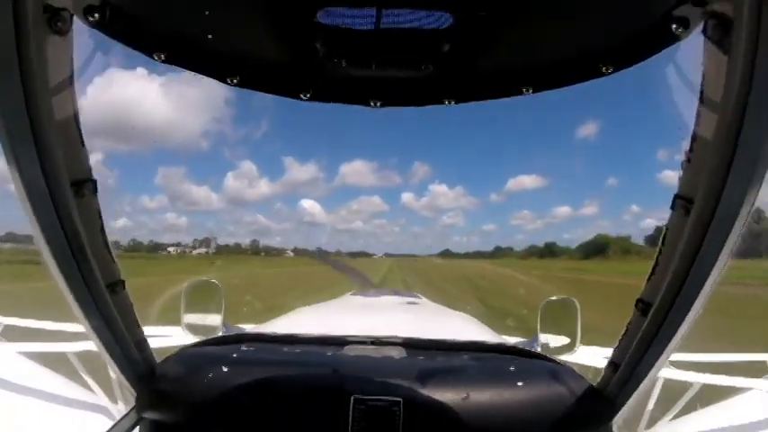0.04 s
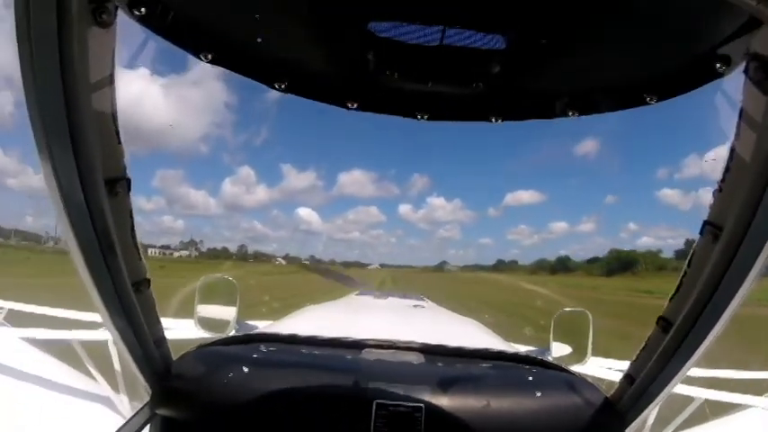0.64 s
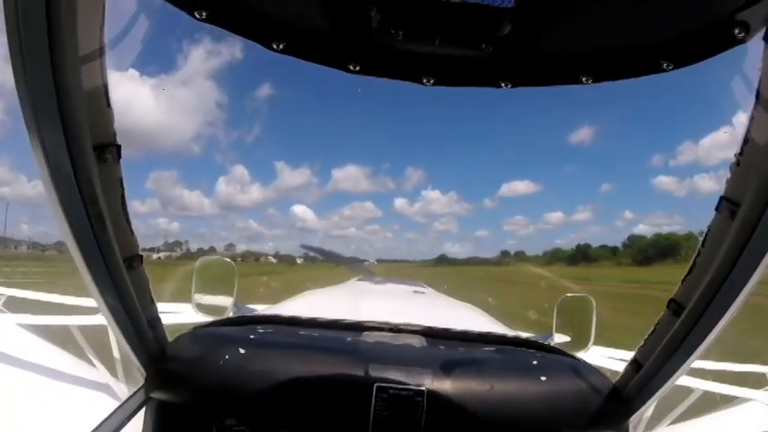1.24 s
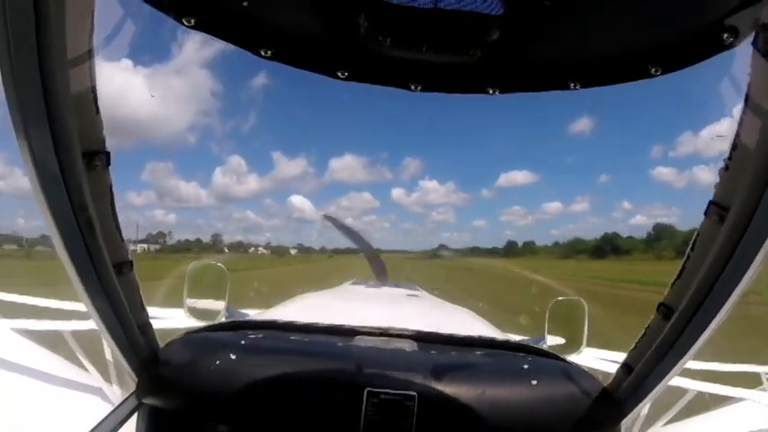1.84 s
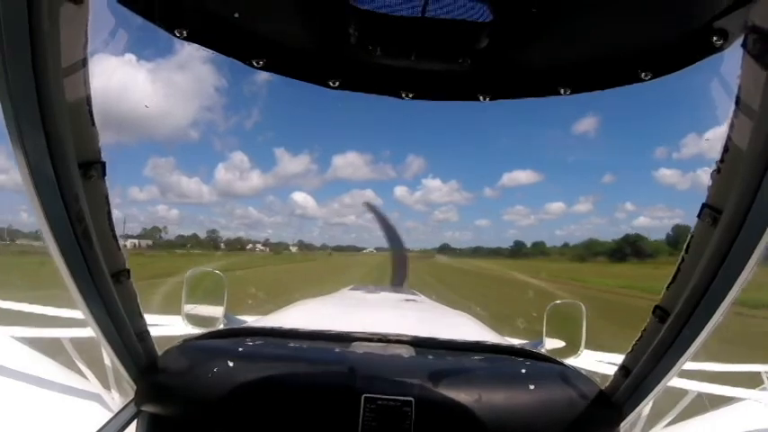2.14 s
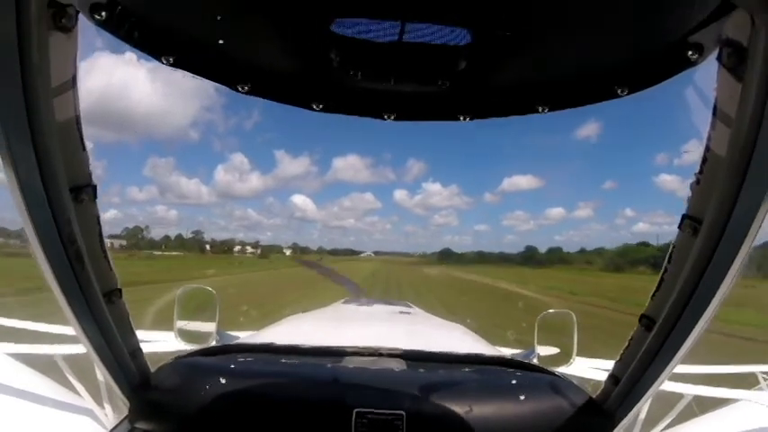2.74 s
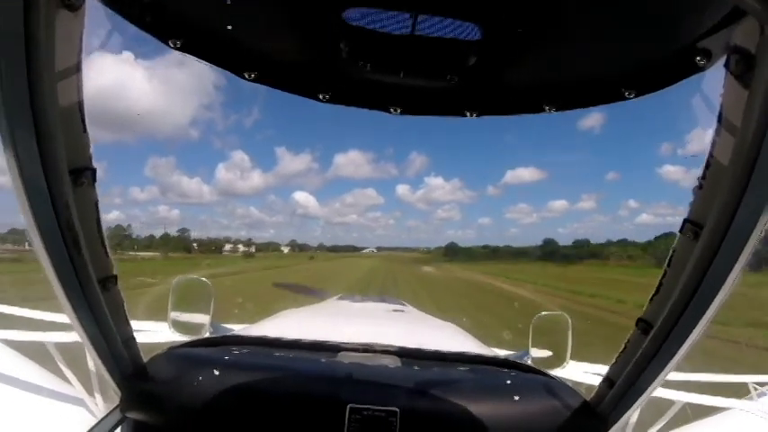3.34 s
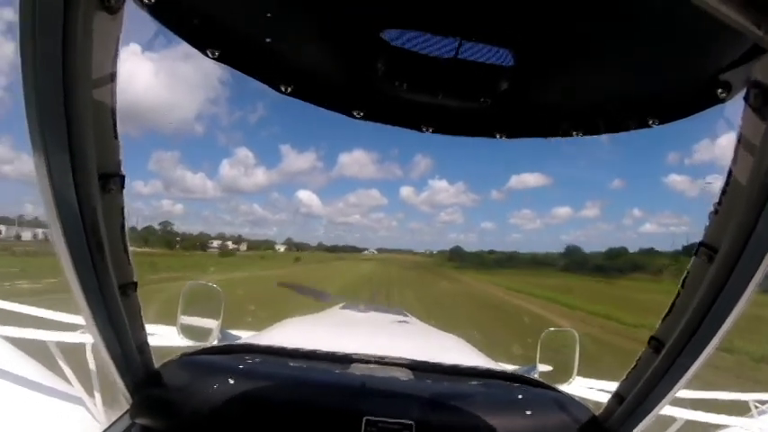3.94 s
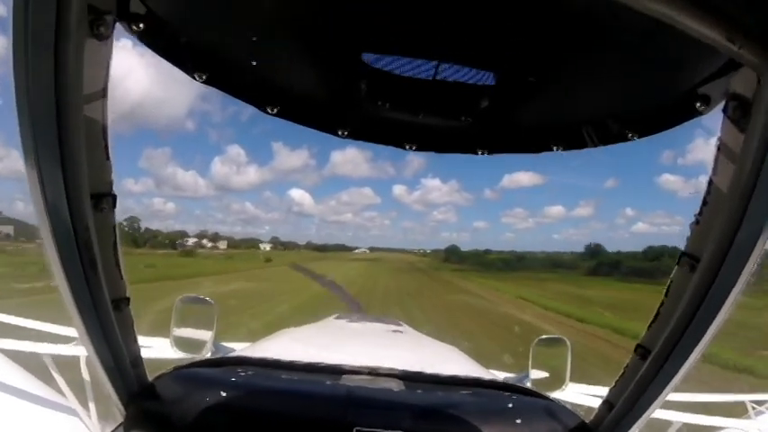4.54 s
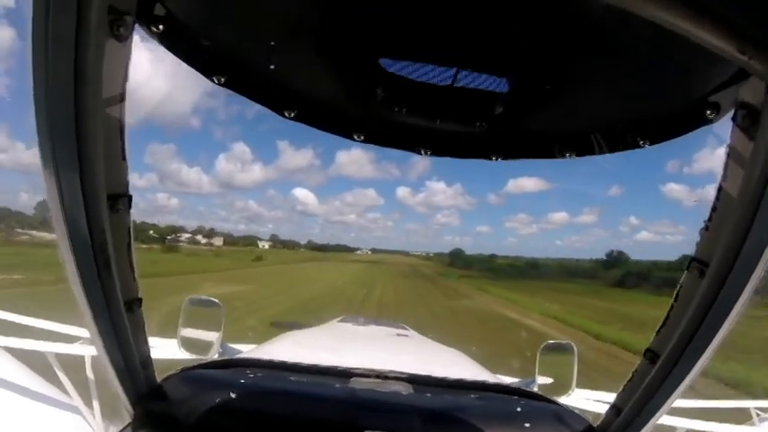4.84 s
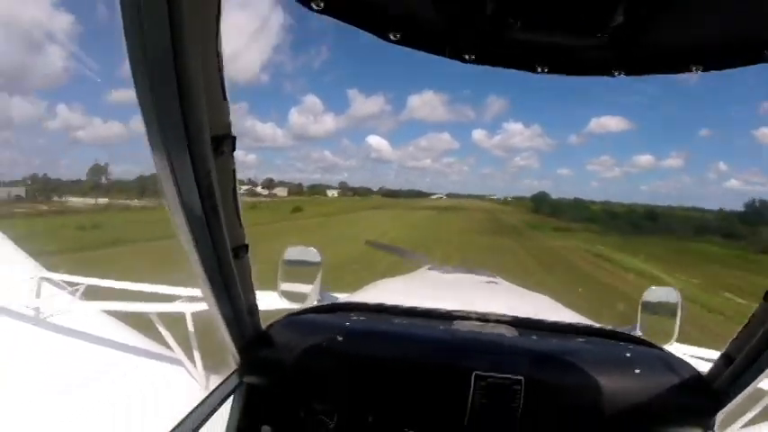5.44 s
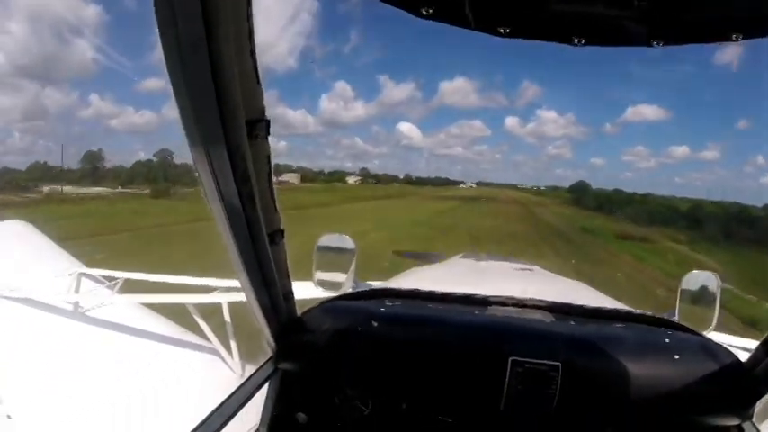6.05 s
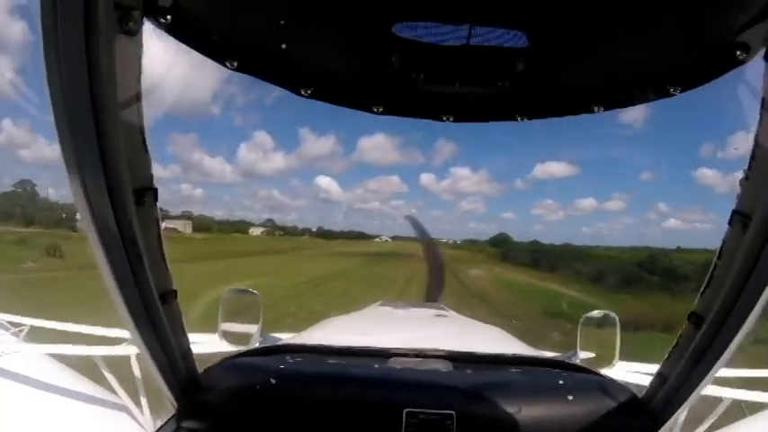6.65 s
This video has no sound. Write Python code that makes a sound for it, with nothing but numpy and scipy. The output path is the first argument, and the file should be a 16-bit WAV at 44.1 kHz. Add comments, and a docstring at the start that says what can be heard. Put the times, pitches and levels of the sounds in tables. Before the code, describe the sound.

Inside a light plane on its takeoff run, the piston engine and propeller drone over a rumbling frame and hissing wind.

```python
"""Small plane taking off

Heard in the cockpit, a light plane leaves a grass strip at full throttle. Its four-cylinder engine
and two-blade propeller drone at about forty turns a second, and the firings ring the engine cover.
The frame rumbles, air hisses along the canopy overhead, and the cabin booms in the gusts."""
import sys
import numpy as np
from scipy import signal
from scipy.fft import rfft, irfft
from scipy.io import wavfile

SR = 44100
rng = np.random.default_rng(int(sys.argv[2]) if len(sys.argv) > 2 else 0)


def generate_wav(sig):
    """Save sig (samples, or channels by samples) to the path in sys.argv[1] as 16-bit PCM at SR."""
    pcm = np.round(np.clip(np.atleast_2d(sig).T, -1, 1) * 32767).astype(np.int16)
    wavfile.write(sys.argv[1], SR, pcm)


N = 295470
TIME = np.arange(N) / SR
HZ = np.fft.rfftfreq(N, 1 / SR)


def from_db(db):
    """Turn decibels into a number to multiply by."""
    return 10 ** (np.asarray(db) / 20)


def unit_power(x):
    """Scale a signal to an average power of 1."""
    return x / np.sqrt(np.mean(x ** 2) + 1e-20)


def curve(rows):
    """Join (time, value) points with straight lines, one value per sample."""
    return np.interp(TIME, *np.transpose(rows))


def swells(rows):
    """Each event rises and falls in a smooth arch; gives one dB curve per lift column."""
    return sum(np.outer(lifts_db, np.cos(np.pi * np.clip((TIME - middle) / length, -.5, .5)) ** 2)
               for middle, length, *lifts_db in rows)


def drift(rate_hz):
    """A random wander of about 1 either way, mostly slower than rate_hz."""
    return unit_power(irfft(rfft(rng.standard_normal(N)) / (1 + (HZ / rate_hz) ** 2), N))


def resonance(hz, width):
    """How a ringing part answers each frequency: most strongly at its own pitch."""
    return 1j * HZ * width / (hz ** 2 - HZ ** 2 + 1j * HZ * width)


def noise(colour, resonances=()):
    """Noise of power 1, shaped by a colour (its level at each frequency) and lifted at resonances."""
    hz, db = np.transpose(colour)
    gain = from_db(np.interp(np.log(HZ + 1), np.log(hz), db))
    gain /= 1 + (HZ / (2 * hz[-1])) ** 2   # fade away above the last row
    for peak_hz, width, lift_db in resonances:
        gain = gain * (1 + (from_db(lift_db) - 1) * resonance(peak_hz, width))
    return unit_power(irfft(rfft(rng.standard_normal(N)) * gain, N))


# From rolling on the grass (0) to flying speed (1): t/s, share
FLYING_SHARE = [(0, 0), (1.6, 0.07), (2.6, 0.8), (4.2, 1), (6.7, 1)]


def with_airspeed(roll_db, flying_db):
    """Slide from one level to the other as the plane gathers speed."""
    return roll_db + curve(FLYING_SHARE) * (flying_db - roll_db)


# The rise and fall of the cabin's overall roar: t/s, level/dB
ROAR_LEVEL = [(0, -32.5), (1.0, -32), (1.48, -32.5), (1.75, -37), (2.05, -38), (3.0, -34.0), (3.9, -35.0),
              (4.7, -32.5), (5.6, -31), (6.2, -34.0), (6.7, -33.5)]


def with_roar(roll_db, flying_db, follows):
    """A level that shifts with airspeed and follows a share of the roar's rise and fall."""
    usual_roar_db = -33
    return with_airspeed(roll_db, flying_db) + follows * (curve(ROAR_LEVEL) - usual_roar_db)


# The engine speeds up a little, then eases: t/s, speed/(turns per s)
ENGINE_SPEED = [(0, 39.81), (1.3, 40.02), (2.0, 40.12), (3.1, 40.57), (3.7, 40.68), (4.7, 41.01),
                (5.5, 40.91), (6.2, 40.42), (6.7, 40.5)]


def engine_turns():
    """Count how many turns the engine's shaft has made so far."""
    return np.cumsum(curve(ENGINE_SPEED)) / SR


def engine_tone(turns, beats):
    """A pure tone of power 1 that vibrates `beats` times for each turn of the shaft."""
    return np.sqrt(2) * np.sin(2 * np.pi * (beats * turns + rng.random()))


# The note of the passing blades, two beats a turn: t/s, level/dB
BLADE_LEVEL = [(0, -14), (0.3, -17.5), (1.1, -11.5), (1.55, -11), (2.2, -16.5), (2.45, -22), (4.3, -22),
               (5.4, -30), (6.7, -23)]
# The main drone, three beats a turn: t/s, level/dB
DRONE_LEVEL = [(0, -15), (0.93, -18), (1.02, -25), (1.32, -27), (1.44, -17.5), (1.85, -10.5), (2.27, -9.5),
               (2.4, -16), (2.77, -24.0), (3.0, -18.5), (3.22, -13.5), (3.33, -9), (3.8, -8.5), (4.45, -13),
               (4.9, -12), (5.45, -17.0), (5.85, -10.5), (6.7, -13)]
# The octave above the drone, six beats a turn: t/s, level/dB
OCTAVE_LEVEL = [(0, -20.5), (0.5, -20), (1.1, -25.5), (2.1, -36), (3.25, -26.5), (3.6, -46), (4.1, -25.5),
                (5.3, -32), (5.8, -26), (6.7, -27.5)]


def drone(turns, level_db=0.02, slip_cycles=0.14, waver_db=0.57):
    """Blades and exhaust make bass tones that slip against each other, so the throb keeps changing."""
    four_beat_db = with_airspeed(roll_db=-29.5, flying_db=-24.5 + .65 * drone_lull())
    levels = {2: curve(BLADE_LEVEL), 3: curve(DRONE_LEVEL), 4: four_beat_db, 6: curve(OCTAVE_LEVEL)}
    sound = np.zeros(N)
    for beats, db in levels.items():
        gain = from_db(db + level_db + waver_db * drift(4))
        sound += gain * engine_tone(turns + slip_cycles / beats * drift(0.24), beats)
    return sound


def drone_lull(usual_db=-14):
    """How many dB the main drone lies below its usual level."""
    return usual_db - curve(DRONE_LEVEL)


# Weaker tones (half beats come from unequal cylinders): beats a turn, rolling level/dB, flying level/dB
WEAK_TONES = [(1, -31, -27.5), (3 / 2, -32, -35.5), (5 / 2, -35.5, -47), (7 / 2, -40, -32.5),
              (9 / 2, -36, -42), (5, -31, -36.5), (7, -41, -30.5), (8, -44, -42.5), (9, -44.5, -47.5),
              (10, -46, -37.5), (12, -59, -53), (13, -48, -56), (16, -51.5, -48), (45 / 2, -44.5, -57),
              (53 / 2, -47, -51.5)]


def weak_engine_tones(turns, level_db=-0.05, waver_db=1.5, slip_turns=.006):
    """The engine's weaker tones change their balance with airspeed and waver in the rough air."""
    sound = np.zeros(N)
    for beats, roll_db, flying_db in WEAK_TONES:
        gain = from_db(with_roar(roll_db, flying_db, follows=.4) + level_db + waver_db * drift(3))
        sound += gain * engine_tone(turns + slip_turns * drift(4), beats)
    return sound


# The four cylinders in the order they fire: relative level/dB, delay/ms
FIRINGS = [(1, -0.033), (-8.5, 0.18), (4, -0.3), (2.5, 0.64)]
# Where the engine cover's panels ring: f/Hz, width/Hz, relative level/dB
COVER_RESONANCES = [(753, 40, -5), (911, 40, -2.5), (940, 40, 0), (1068, 36, -2.5), (1215, 70, -16.5),
                    (1770, 420, -20)]


def engine_cover(turns, uneven_db=2.0, jitter_ms=.04):
    """Two firings a turn, each with its own strength and delay, ring the panels over the engine."""
    due = np.flatnonzero(np.diff(np.floor(2 * turns)))
    firing_db, delay_ms = np.array(FIRINGS)[np.arange(len(due)) % len(FIRINGS)].T
    time_scatter, level_scatter = rng.standard_normal((len(due), 2)).T
    fired = due + np.round((delay_ms + jitter_ms * time_scatter) * SR / 1000).astype(int)
    pulses = np.zeros(N)
    pulses[np.clip(fired, 0, N - 1)] = from_db(firing_db + uneven_db * level_scatter)
    panels = sum((-1) ** k * from_db(db) * resonance(hz, width)
                 for k, (hz, width, db) in enumerate(COVER_RESONANCES))
    ring_db = with_roar(roll_db=-37.5, flying_db=-39.5, follows=.8) + 0.18 * drone_lull()
    return from_db(ring_db) * unit_power(irfft(rfft(pulses) * panels, N))


# The frame's rumbling shake: f/Hz, relative level/dB
SHAKE_NOISE = [(15, -41), (45, -17.5), (58, -12.5), (80, -2.5), (105, -1), (140, -1), (165, -6.5),
               (200, -6.5), (222, -4), (240, -6.5), (280, -9), (320, -13), (350, -21.5), (700, -46)]
# Its deeper heave: f/Hz, relative level/dB
HEAVE_NOISE = [(10, -38), (20, -10), (30, -1.5), (48, 1.5), (65, -3.5), (100, -23), (200, -59)]
# Bumps that jolt the frame: middle t/s, length/s, lift/dB
BUMP_SWELLS = [(0.46, .36, 5), (0.95, .3, 8), (5.55, 0.84, 7)]


def frame_rumble(turns, pulse_db=0.84, bump_share=0.12):
    """The frame shakes, pulsing once every two engine turns, and heaves over the bumps."""
    bump_db, = swells(BUMP_SWELLS)
    shake_db = with_roar(roll_db=-21.0, flying_db=-21.5, follows=0.57) + bump_share * bump_db
    shake_db += pulse_db * engine_tone(turns, beats=1 / 2)
    heave_db = with_roar(roll_db=-32.0, flying_db=-37.0, follows=1.3) + bump_db
    return from_db(shake_db) * noise(SHAKE_NOISE) + from_db(heave_db) * noise(HEAVE_NOISE)


# Air rushing past: f/Hz, relative level/dB
AIR_NOISE = [(300, -6), (690, -2), (780, 2), (1050, 2.5), (1300, 0), (1600, -1.5), (2100, -2.5), (3300, -4),
             (5400, -10.5), (6400, -11), (7100, -14.5), (9000, -21.5), (10200, -32), (11200, -36)]
# Whistles at the canopy's seams: f/Hz, width/Hz, lift/dB
SEAM_WHISTLES = [(1064, 22, 7.3), (1887, 130, 2.1), (2143, 59, 3.5), (2870, 24, 3.3), (6040, 300, 3.4),
                 (6425, 244, 7.25), (10950, 650, 4.3)]


def rushing_air(turns, throb_db=0.17, flutter_db=0.5):
    """Air hisses along the canopy and whistles at its seams, throbbing slightly with the engine."""
    throb = engine_tone(turns, beats=2) + engine_tone(turns, beats=3)
    hiss_db = with_roar(roll_db=-31.0, flying_db=-30.5, follows=1.1) + throb_db * throb
    return noise(AIR_NOISE, SEAM_WHISTLES) * from_db(hiss_db + flutter_db * drift(25))


# The cabin's hollow boom: f/Hz, relative level/dB
BOOM_NOISE = [(150, -30), (240, -12.5), (272, 3), (315, 0.5), (345, -7.5), (385, -2.5), (440, -1.5),
              (500, -7), (590, -9), (655, -8.5), (690, -16.5), (900, -18), (1300, -24), (3000, -47.5)]
# Where the cabin rings: f/Hz, width/Hz, lift/dB
CABIN_RESONANCES = [(288.5, 26, 2.5), (410, 24, 3)]
# Gusts of wind: middle t/s, length/s, boom lift/dB, hum lift/dB
GUST_SWELLS = [(3.0, 0.63, 3, 3.5), (4.02, .45, 0, 6.5), (5.3, .5, 2, 4.5), (5.75, .6, 5, 7.5),
               (6.68, 0.34, 1.5, 0)]


def cabin(hum_hz=412.3, wander_hz=4.0, waver_db=0.5):
    """The cabin booms and keeps humming on one unsteady note; both grow with airspeed and in gusts."""
    gust_boom_db, gust_hum_db = swells(GUST_SWELLS)
    boom_db = with_roar(roll_db=-30.0, flying_db=-26.0, follows=.85) + gust_boom_db
    boom = from_db(boom_db) * noise(BOOM_NOISE, CABIN_RESONANCES)
    hum_db = with_roar(roll_db=-37, flying_db=-35.5, follows=.6) + gust_hum_db
    cycles = np.cumsum(hum_hz + wander_hz * drift(9.87)) / SR
    hum = from_db(hum_db - waver_db * drift(7.8)) * np.sqrt(2) * np.sin(2 * np.pi * cycles)
    return boom + hum


def scene():
    """The engine, cabin, air and frame all sound from start to end, mixed into one channel."""
    turns = engine_turns()
    engine = drone(turns) + weak_engine_tones(turns) + engine_cover(turns)
    return (engine + cabin() + rushing_air(turns) + frame_rumble(turns))[None]


def record(dry):
    """Round off the loudest peaks and steeply cut the highest treble."""
    ceiling, hardness, cutoff_hz = .92, 8, 11600
    rounded = dry / (1 + (dry / ceiling) ** hardness) ** (1 / hardness)
    treble_cut = signal.ellip(8, .2, 80, cutoff_hz, fs=SR, output="sos")
    return signal.sosfilt(treble_cut, rounded)


dry = scene()
out = record(dry)
generate_wav(out)
```